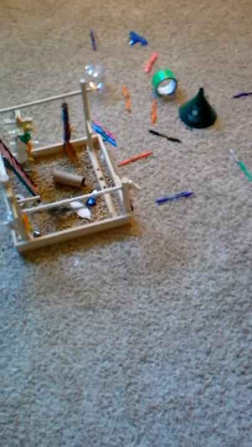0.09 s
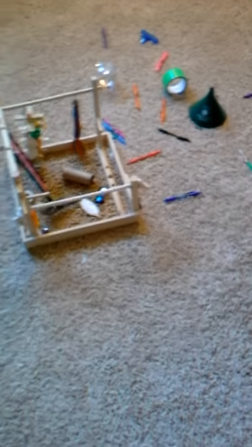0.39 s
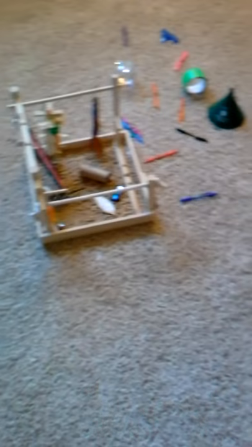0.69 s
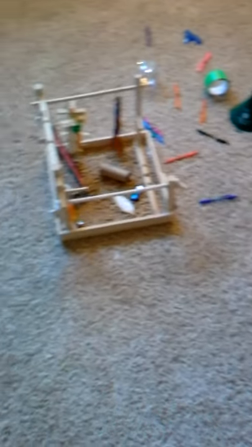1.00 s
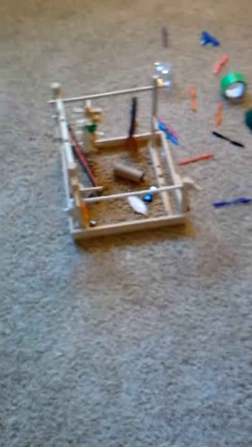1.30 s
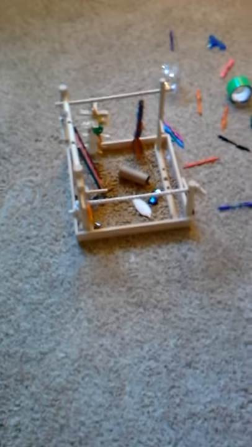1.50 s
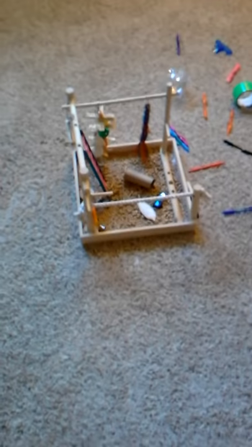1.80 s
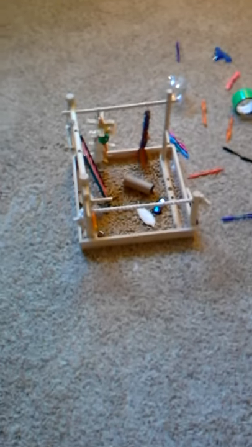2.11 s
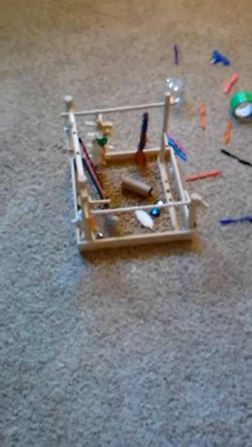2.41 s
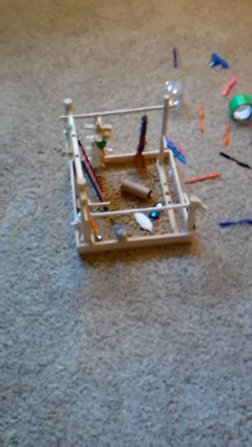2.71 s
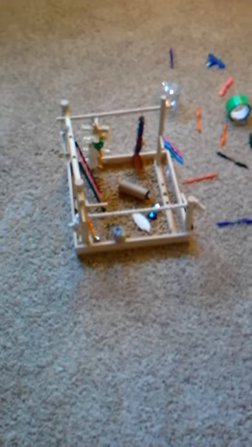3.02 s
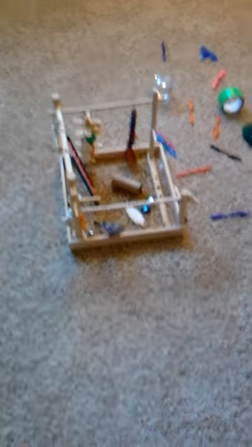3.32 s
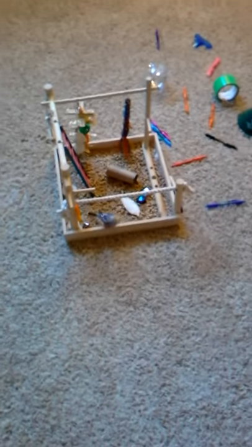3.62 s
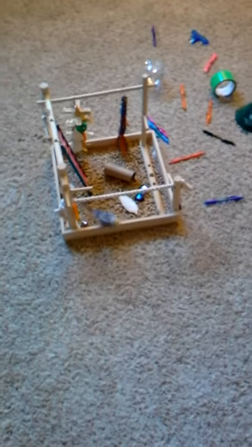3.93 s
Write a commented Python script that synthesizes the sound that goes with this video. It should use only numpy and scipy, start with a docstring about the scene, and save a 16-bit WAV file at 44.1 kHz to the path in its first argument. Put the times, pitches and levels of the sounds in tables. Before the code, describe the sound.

Close to the microphone, a small bird clambers over wooden perches and toys with sharp, irregular ticks and dry rustles. One knock comes near the start, and the ticking pauses briefly before another flurry. The quiet room hums faintly.

```python
"""Sharp little ticks and one knock: close to the microphone a small bird climbs about a wooden play stand
in a quiet room. Beak and claws tick on perches and toys, one toy knocks on the wood, another rings faintly,
and feet scrape through dry litter in showers of tiny contacts. The walls answer briefly. Far down lie
a pulsing electrical hum, a thin wavering whine and microphone hiss."""
import sys
import numpy as np
from scipy import signal
from scipy.fft import rfft, irfft
from scipy.io import wavfile
from scipy.ndimage import map_coordinates

SR = 44100
rng = np.random.default_rng(int(sys.argv[2]) if len(sys.argv) > 2 else 0)


def wav_out(sig):
    """Save sig, one row per channel (or a flat mono array), as 16-bit PCM at SR to the path in sys.argv[1]."""
    wavfile.write(sys.argv[1], SR, np.round(np.clip(np.atleast_2d(sig).T, -1, 1) * 32767).astype(np.int16))


N = 176400

# beak and claw ticks: t/s, woody body/dB, dry rasp/dB, bright click/dB, room send/dB
BEAK_AND_CLAW_TICKS = [(.011, -81, -73, -58, -25), (0.041, -72, -71, -69, 12),
                       (0.0503, -55, -65, -44.5, -9.5), (0.0754, -72, -64, -54, -9),
                       (.098, -60, -80, -57, -9), (0.337, -71, -75.5, -71.5, -0.5),
                       (.424, -74.5, -79, -88, -4), (0.498, -68, -73, -65, -1),
                       (0.7668, -53.5, -60.5, -54, -1.5), (0.8789, -62, -65.5, -62, -0.5),
                       (.882, -63, -59.5, -62, -11), (1.066, -78, -55.5, -61, -1),
                       (1.08, -61.5, -63, -80, 0), (1.168, -75, -81, -87, 5.5), (1.201, -80, -77.5, -77, 9),
                       (1.283, -64.5, -80, -87, 1.5), (1.295, -76.5, -80, -87, 11),
                       (1.313, -67, -69, -77, 0.5), (1.335, -57.5, -55.5, -55, -3.5),
                       (1.339, -65, -59, -54, 0), (1.39, -64, -84, -78, -2), (1.46, -66.5, -66, -66, 7.5),
                       (1.4655, -62.5, -59, -52, -0.5), (1.475, -60.5, -60, -59, 3.5),
                       (1.535, -60.5, -72, -70, -2.5), (1.55, -60.5, -79, -69, -8.5),
                       (1.675, -76, -78.5, -75, 2), (2.333, -63.5, -63, -52, -3),
                       (2.379, -69.5, -69, -82, 2.5), (2.391, -57.5, -56.5, -52, -2),
                       (2.395, -55.5, -55, -50, -5.5), (2.4603, -58, -56, -54.5, 0.5),
                       (2.479, -55.5, -62, -60, -2), (2.4925, -56.5, -63, -67, -2),
                       (2.499, -53, -62, -75, -3), (2.5252, -50.5, -61, -64, -12),
                       (2.532, -73, -70, -67.5, 9), (2.628, -59, -60, -61, -2.5),
                       (2.636, -84, -66, -72, -10), (2.725, -70, -88, -78, -2), (2.81, -83, -85, -84, 8),
                       (2.89, -78, -79, -78, 1.5), (2.928, -82, -68, -86, -8), (3.376, -75, -86, -78, -4),
                       (3.424, -80.5, -93, -84, 5.5)]
# hollow thuds of the wooden tray: t/s, level/dB
TRAY_THUDS = [(.051, -59.5), (.1356, -45), (2.4925, -63.5), (2.502, -67), (2.578, -69)]
# snaps of dry splinters: t/s, level/dB
SPLINTER_SNAPS = [(.1352, -54), (1.207, -68), (1.224, -72), (1.333, -82), (2.395, -73)]
# foot strokes through the litter: t/s, length/s, woody body/dB, bright click/dB
FOOT_SCRAPES = [(0, 0.043, -79.5, -66.5), (0.039, 0.08, -78.5, -70), (.54, .04, -85, -93),
                (0.655, 0.045, -80.5, -85), (0.965, 0.056, -89.5, -86.5), (1.056, 0.049, -77, -76),
                (1.399, 0.031, -78, -88), (2.31, 0.048, -77, -84), (2.538, 0.068, -69, -76.5),
                (2.606, 0.094, -77, -79.5), (2.765, 0.017, -86.5, -84.5), (2.895, 0.02, -83.5, -91)]
# soft low bumps: t/s, f/Hz, level/dB
LOW_BUMPS = [(0.039, 219, -77), (0.229, 224, -79), (1.334, 210, -83), (1.439, 155, -84), (2.294, 251, -79),
             (2.324, 202, -75.5)]
# a toy is brushed: t/s, level/dB
TOY_TOUCHES = [(0.7656, -85), (1.4654, -86)]
# its modes: f/Hz, level/dB, T60/s
TOY_MODES = [(2240, -0.5, 1.2), (5000, -5, 1.2), (5470, 0.5, 1.2)]
# spectra of the contacts: f/Hz, level/dB
WOODY_BODY = [(200, -40.5), (450, -20.5), (800, -9), (1050, -5), (1220, -7), (1420, -1.5), (1620, 0),
              (1780, -2.5), (1950, 1.5), (2150, -3.5), (2500, -7), (3200, -15), (5000, -42)]
DRY_RASP = [(1200, -34.5), (2300, -4), (3100, -2), (3700, -2), (4400, -1.5), (5000, -5), (6200, -19),
            (10000, -51)]
BRIGHT_CLICK = [(1500, -37.5), (2600, -31), (3800, -17.5), (4600, -4), (5150, 1.5), (5650, -5), (6200, -17),
                (7400, -24), (9000, -34), (14000, -51.5)]
HOLLOW_TRAY = [(100, -28), (250, -16.5), (450, -7.5), (650, -5.5), (800, 0), (950, -2.5), (1100, -5),
               (1400, -21.5), (2500, -42)]
THIN_SNAP = [(3000, -46), (5500, 5), (6600, 0.5), (8000, -13), (10000, -17), (14000, -34)]
# decay of the room: f/Hz, T60/s
ROOM_DECAY = [(300, 0.52), (1000, 0.38), (2500, 0.46), (5000, .33), (10000, 0.21)]
# steady tones beside the hum: f/Hz, level/dB
HUM_TONES = [(46.8, -86.5), (78.3, -84.5), (113.9, -94), (121.6, -91), (172.3, -99), (215.3, -106)]
# noise spectra of the electronics and the microphone: f/Hz, level/dB
MURMUR_SPECTRUM = [(20, -2.5), (60, -8), (100, 2), (150, -2), (200, -22.5), (235, -21), (270, -4),
                   (320, -4), (380, -8), (480, -22.5), (900, -51)]
HISS_SPECTRUM = [(260, -28.5), (450, -4.5), (750, -7.5), (1200, -11.5), (1900, -12.5), (3300, -13.5),
                 (4600, -13.5), (5130, -6), (6200, -15), (7300, -9), (8200, -12.5), (9900, -9),
                 (10900, -5.5), (12000, -6), (13500, -3.5), (14300, -8.5), (15000, -19.5)]

BODY_T60_S, CLICK_T60_S = 0.006, 0.004
BIRD_GAIN_DB = -3.5  # on ticks, knock, snaps, thuds and scrapes together


def ticks():
    """Close up, each touch of beak or claw has a woody body, a dry rasp and a bright click."""
    out = np.zeros(N)
    for start, body_db, rasp_db, click_db, room_db in BEAK_AND_CLAW_TICKS:
        add(out, start, contact(WOODY_BODY, BODY_T60_S, body_db, room_db))
        add(out, start, contact(DRY_RASP, CLICK_T60_S, rasp_db, room_db))
        add(out, start, contact(BRIGHT_CLICK, CLICK_T60_S, click_db, room_db))
    return out


def contact(spectrum, t60, db, room_db=0):
    """A spike and a brief rough crack ring the object, then the room answers."""
    t = np.arange(SR // 50) / SR
    resonance = ring(spectrum)
    crack = rng.standard_normal(len(t)) * fade(t, t60)
    crack[0] = 1.16 * np.linalg.norm(crack) * rng.choice([-1, 1])  # clean first impact
    direct = signal.fftconvolve(crack, resonance)
    out = signal.fftconvolve(room(room_db), resonance / np.linalg.norm(resonance))
    add(out, 0, direct / np.linalg.norm(direct))
    return amp(db) * out * np.sqrt(SR / 1000)  # db: direct energy spread over 1 ms


def toy_knock(start=0.1352):
    """A toy strikes the wood once, harder and longer than a tick."""
    out = np.zeros(N)
    for spectrum, db in [(WOODY_BODY, -51.5), (DRY_RASP, -49.5), (BRIGHT_CLICK, -43)]:
        add(out, start, contact(spectrum, t60=0.008, db=db))
    return out


def tray_thuds():
    """Heavier contacts make the tray sound hollow."""
    out = np.zeros(N)
    for start, db in TRAY_THUDS:
        add(out, start, contact(HOLLOW_TRAY, t60=0.024, db=db))
    return out


def splinter_snaps():
    """Dry splinters give way with a thin, high snap."""
    out = np.zeros(N)
    for start, db in SPLINTER_SNAPS:
        add(out, start, contact(THIN_SNAP, CLICK_T60_S, db))
    return out


def foot_scrapes(grains_per_s=420, spread_db=2.5, edge_s=0.011):
    """A foot drags through the litter: a shower of tiny contacts of uneven size."""
    out, t = np.zeros(N), np.arange(SR // 4) / SR
    for start, length, body_db, click_db in FOOT_SCRAPES:
        stroke = np.clip(np.minimum(t, length - t) / edge_s + 0.5, 0, 1)
        hits = rng.random(len(t)) < grains_per_s / SR
        grains = hits * amp(spread_db * rng.standard_normal(len(t)))
        rasp_db = (body_db + click_db) / 2 - 2.5
        rustle = np.zeros(len(t))
        for spectrum, db in [(WOODY_BODY, body_db), (DRY_RASP, rasp_db), (BRIGHT_CLICK, click_db)]:
            kicks = grains * rng.choice([-1, 1], len(t))
            ringing = signal.fftconvolve(kicks, ring(spectrum))[:len(t)]
            rustle += stroke * amp(db) * unit(ringing)
        add(out, start, rustle)
        add(out, start, signal.fftconvolve(rustle, room(-3.5)))  # echo as strong as the direct sound
    return out


def low_bumps(length_s=0.049, sag_hz_per_s=320):
    """Soft low bumps swell and fade as their pitch sinks."""
    out, t = np.zeros(N), np.arange(int(length_s * SR)) / SR
    swell = np.sin(np.pi * t / length_s) ** 2
    for start, hz, db in LOW_BUMPS:
        sinking_hz = hz - sag_hz_per_s * (t - length_s / 2)
        phase = 2 * np.pi * np.cumsum(sinking_hz) / SR
        add(out, start, amp(db) * swell * np.sin(phase))
    return out


def toy_jingle():
    """A few thin modes of a brushed toy outlast the tick that set them off."""
    out, t = np.zeros(N), np.arange(SR) / SR
    for start, db in TOY_TOUCHES:
        for hz, mode_db, t60 in TOY_MODES:
            add(out, start, amp(db + mode_db) * fade(t, t60) * np.sin(2 * np.pi * hz * t))
    return out


def room(send_db, gain_db=3.5, wall_delay_s=0.006):
    """Nearby walls answer with dense early reflections and a tail that dies band by band."""
    hz, t, bands = signal.stft(rng.standard_normal(SR // 2), SR, nperseg=256)
    early = amp(3) * fade(t, t60=0.079)
    late = fade(t, along(ROOM_DECAY, hz)[:, None])
    echo = signal.istft(bands * (early + late), SR)[1]
    echo = amp(gain_db + send_db) * echo / np.linalg.norm(echo)
    return np.pad(echo, (int(wall_delay_s * SR), 0))


def electrical_hum(hum_hz=93.7, pulse_hz=7.62, throb_hz=110.3, throb_rate_hz=4.98):
    """Behind the bird a hum pulses in level and pitch, with a slower throb and faint steady tones."""
    t = np.arange(N) / SR
    beat = 2 * np.pi * pulse_hz * (t - 0.124)
    pulse = 1 + 0.51 * np.tanh(2.2 * np.cos(beat))  # rounded square wave
    hum = amp(-73.5) * unit(pulse * np.sin(2 * np.pi * hum_hz * t + 0.75 * np.sin(beat)))
    gate = np.exp(9.4 * np.cos(2 * np.pi * throb_rate_hz * (t - 0.112)))  # narrow peaks
    throb = amp(-86.5) * unit(gate * np.sin(2 * np.pi * throb_hz * t))
    tones = sum(amp(db) * unit(np.sin(2 * np.pi * (hz * t + rng.random()))) for hz, db in HUM_TONES)
    return hum + throb + tones


def electrical_whine(start_hz=10950, sag_hz_per_s=28, waver_hz=85, sway_rate_hz=12.5):
    """A thin whine, barely there, wavers and slowly sinks."""
    t = np.arange(N) / SR
    sway = np.sin(2 * np.pi * sway_rate_hz * t + wobble(7.9))
    jitter = wobble(110)
    hz = start_hz - sag_hz_per_s * t + waver_hz * (sway + jitter)
    flicker = amp(1.4 * wobble(150))
    return amp(-90.5) * unit(flicker * np.sin(2 * np.pi * np.cumsum(hz) / SR))


def noise_floor():
    """The electronics murmur unevenly under the steady hiss of the microphone."""
    swell = amp(2.5 * wobble(20))
    murmur = amp(-85) * unit(swell * noise(MURMUR_SPECTRUM))
    hiss = amp(-83.5) * noise(HISS_SPECTRUM)
    return murmur + hiss


def amp(db):
    """Decibels to gain."""
    return 10 ** (np.asarray(db) / 20)


def unit(x):
    """Scale to rms 1."""
    return x / np.sqrt(np.mean(x ** 2) + 1e-30)


def along(points, hz):
    """(Hz, value) points on a log axis."""
    f, v = np.transpose(points)
    return np.interp(np.log(hz + 1), np.log(f + 1), v)


def wobble(rate):
    """A smooth random curve, rate knots a second."""
    return map_coordinates(rng.standard_normal(int(N * rate / SR) + 4), [np.arange(N) * rate / SR])


def fade(t, t60):
    """Exponential decay, 60 dB in t60."""
    return np.exp(-np.log(1000) * t / t60)


def noise(spectrum):
    """Steady coloured noise of rms 1."""
    return unit(irfft(rfft(rng.standard_normal(N)) * amp(along(spectrum, np.fft.rfftfreq(N, 1 / SR))), N))


def ring(spectrum, size=1024):
    """Causal impulse response with the given colour."""
    c = irfft(np.log(amp(along(spectrum, np.fft.rfftfreq(size, 1 / SR)))))
    c[1:size // 2] *= 2
    c[size // 2 + 1:] = 0
    return irfft(np.exp(rfft(c)))


def add(out, s, x):
    """Mix x into out at time s."""
    part = out[max(0, round(s * SR)):][:len(x)]
    part += x[:len(part)]


def scene():
    """One microphone near the stand: the bird in front, hum, whine and hiss far below."""
    bird = ticks() + toy_knock() + tray_thuds() + splinter_snaps() + foot_scrapes()
    foreground = amp(BIRD_GAIN_DB) * bird + low_bumps() + toy_jingle()
    background = electrical_hum() + electrical_whine() + noise_floor()
    return (foreground + background)[None]


def record(dry):
    """The recorder cuts the top and rests slightly off zero."""
    top_hz, dc_offset = 15000, -0.0335
    passband = np.fft.rfftfreq(N, 1 / SR) < top_hz
    return irfft(rfft(dry) * passband, N) + dc_offset


dry = scene()
out = record(dry)
wav_out(out)
```